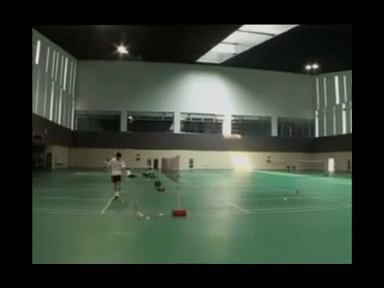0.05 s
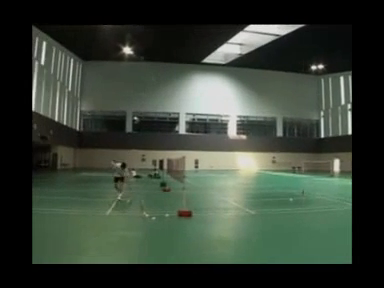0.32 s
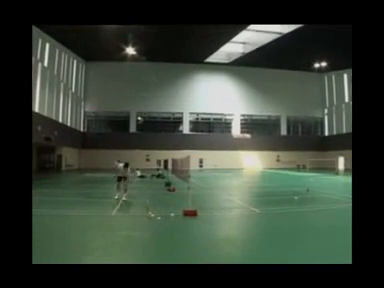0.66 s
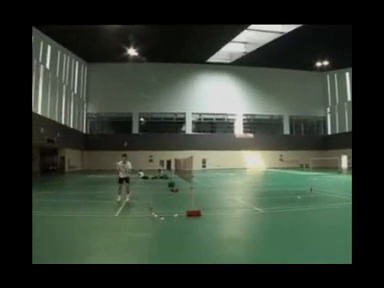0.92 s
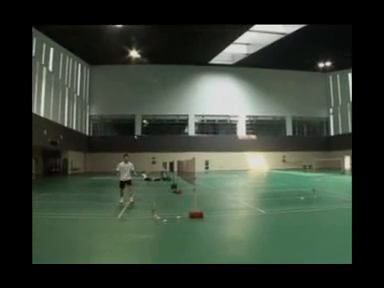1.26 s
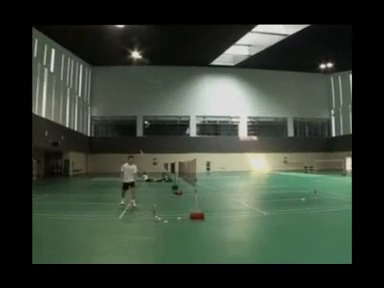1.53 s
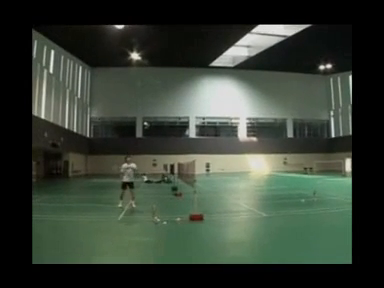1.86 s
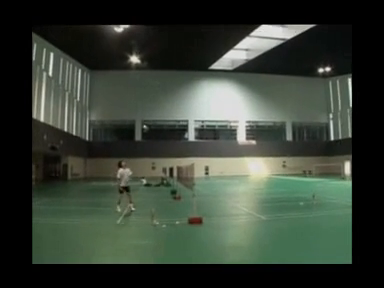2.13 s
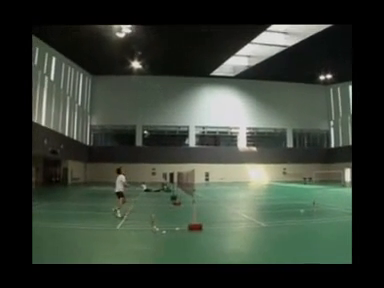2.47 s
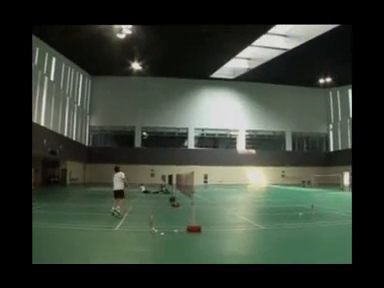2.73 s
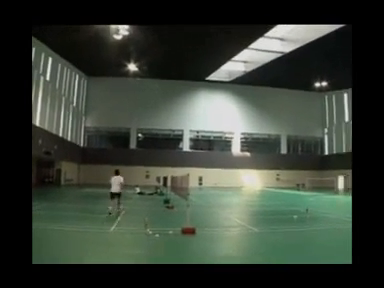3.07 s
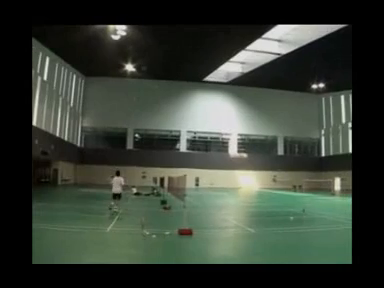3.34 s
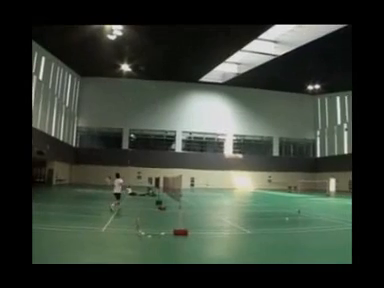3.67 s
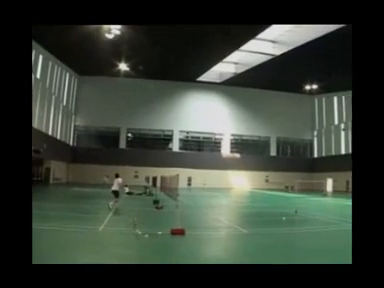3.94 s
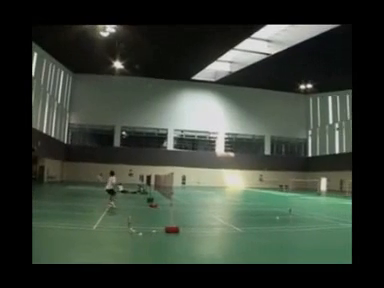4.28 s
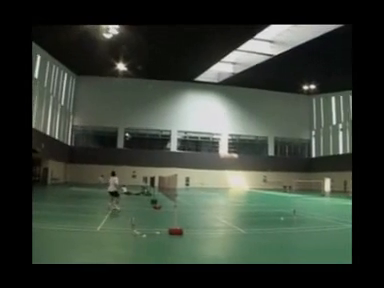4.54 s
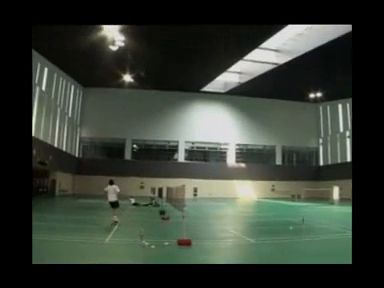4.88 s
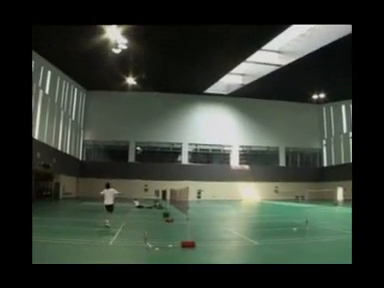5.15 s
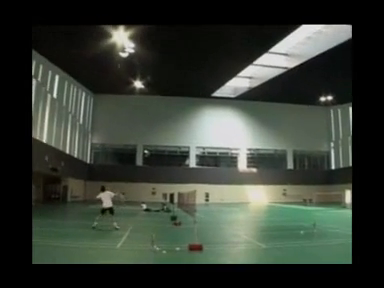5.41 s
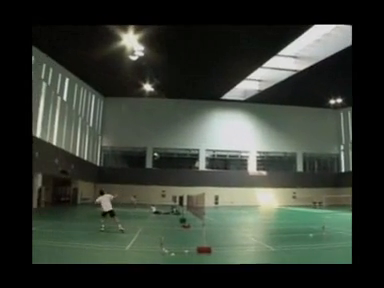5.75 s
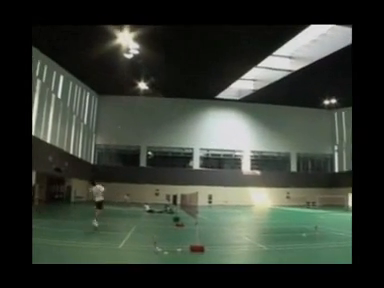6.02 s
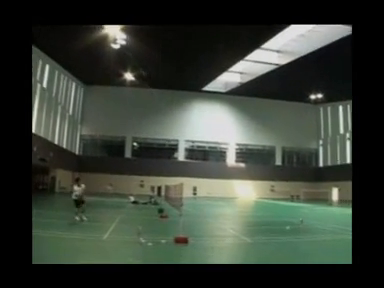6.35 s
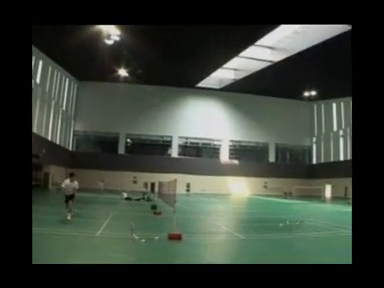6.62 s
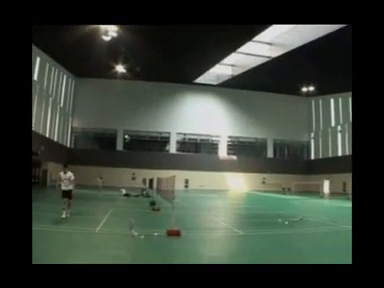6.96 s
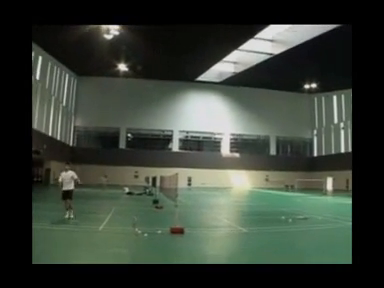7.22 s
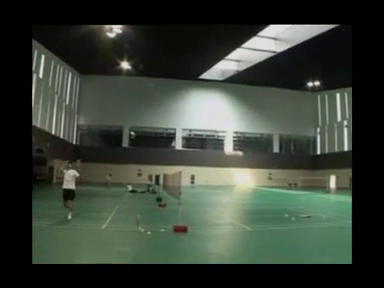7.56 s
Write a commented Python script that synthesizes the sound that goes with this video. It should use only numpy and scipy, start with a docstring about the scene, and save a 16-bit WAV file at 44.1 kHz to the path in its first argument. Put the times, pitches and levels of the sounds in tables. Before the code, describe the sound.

In a large empty sports hall, a badminton racket hits a shuttlecock three times, a couple of seconds apart, each crack echoing off the far walls. A shoe squeaks sharply between the first two hits, and feet tap and scuff lightly. The third hit is the loudest, with a quick swish, and is followed by a hollow knock that rings on. Ventilation rumbles softly underneath.

```python
"""Badminton in an empty sports hall.

The racket swishes and cracks three times, its strings ping, and each stroke slaps back off the far
walls into a long reverb. A shoe squeaks, feet tap and scuff, and the last shot knocks on something
hollow that rings on. Underneath, ventilation rumbles and earlier play fades under the roof."""
import sys
import numpy as np
from scipy import signal
from scipy.fft import rfft, irfft, next_fast_len
from scipy.io import wavfile

SR = 44100
rng = np.random.default_rng(int(sys.argv[2]) if len(sys.argv) > 2 else 0)


def inscribe(sig):
    """Save sig as 16-bit PCM at rate SR to the path in sys.argv[1].

    A 1-D sig is mono; a 2-D sig holds one channel per row.
    Samples are clipped to [-1, 1] before scaling.
    """
    pcm = np.round(np.clip(np.atleast_2d(sig).T, -1, 1) * 32767)
    wavfile.write(sys.argv[1], SR, pcm.astype(np.int16))


N = 334895
SHORT = np.arange(2 ** 14) / SR   # time axis of a one-shot [s]


# Racket hits: (time [s], crack level [dB], crack decay [s], string pitch [Hz], ping level [dB],
# ping towards the walls [dB], swish level [dB], top swish pitch [Hz], reverb send [dB])
STROKES = [(2.0931, -18, 0.0046, 892, -22, -48, -42, 639, -5.5),
           (4.2644, -23, 0.0049, 945, -22, -23.5, -39.5, 598, -3),
           (6.5531, -10, 0.0065, 1045, -25.5, -26, -24.5, 1320, -3.5)]
# One EQ curve per hit, from crisp clear to smash: (frequency [Hz], relative level [dB])
CRACK_COLOURS = [
    [(30, -2), (120, -7.5), (400, 1.5), (1000, 2), (2000, 0), (3200, 2), (4000, -1), (5400, 2.5),
     (7500, -3.5)],
    [(30, -27), (120, -7.5), (300, 3.5), (700, -2), (1200, -3), (1600, 0), (2400, -10.5), (5000, -11.5),
     (7500, -14.5)],
    [(30, -40), (120, -11), (310, 5.5), (500, -3), (750, -2), (1000, -2.5), (1450, -1), (2600, -7.5),
     (4000, -11), (7500, -8.5)],
]
# String bed modes, the lowest a close pair: (pitch ratio [x], relative level [dB], t60 [s])
STRING_MODES = [(1, -7, .32), (1.025, -9, 0.19), (1.529, -19.5, 0.18), (1.63, -13, 0.14),
                (1.96, -16.5, 0.23), (3.25, -17.5, .12)]
# Echoes from where the player stands for each hit:
# (first echo delay [s], its level [dB], its spread [s], far wall level [dB])
PLAYER_SPOTS = [(0.045, -9, 0.017, -17), (.015, -4.5, 0.0066, -21), (.027, -12, 0.0064, -22.5)]

def strokes(swing_s=.05, touch_s=.0021, touch_db=-14, touch_decay=.00031, swing_out_db=-5):
    """Swing, first touch of the shuttle, full impact and string ping; returns near mix and reverb send."""
    near, send = np.zeros((2, N))
    for row, colour, spot in zip(STROKES, CRACK_COLOURS, PLAYER_SPOTS):
        s, db, decay, string_hz, string_db, string_out_db, swish_db, swish_hz, send_db = row
        swing = from_db(swish_db) * swish(swing_s, swish_hz)
        ping = ring([(ratio * string_hz, level, t60) for ratio, level, t60 in STRING_MODES], SHORT)
        add(near, s - swing_s, swing)
        add(near, s - touch_s, crack(colour, db + touch_db, touch_decay))
        add(near, s, crack(colour, db, decay) + from_db(string_db) * ping)
        # the walls get the whole stroke, but a racket is too small to throw much bass
        thin_crack = band(radiated(colour, db), 230, 18000, order=1)
        outward = np.zeros(len(SHORT))
        add(outward, 0, from_db(swing_out_db) * swing)
        add(outward, swing_s, thin_crack + from_db(string_out_db) * ping)
        add(near, s - swing_s, slapback(outward, *spot))
        add(send, s - swing_s, from_db(send_db) * outward)
    return near, send


def crack(colour, db, decay, snap=.2, bounce=.19, bounce_s=.0011):
    """The cork's sharp impact, its reflection off the floor and the clatter of feathers and frame."""
    hit = energy_one(dying_noise(decay))
    hit[0] += snap
    add(hit, bounce_s, np.array([-bounce]))
    return burst(coloured(hit, colour), db)


def radiated(colour, db):
    """Summed over all directions, a crack is one clean pulse with a smooth spectrum."""
    return burst(coloured(signal.unit_impulse(len(SHORT)), colour), db)


def swish(length_s, top_hz, start_ratio=.31, rise_db=48, hiss_db=-5, hiss_rise_db=17):
    """The shaft sheds vortices: a breathy tone climbs and swells with the swing as the strings hiss."""
    speed = np.linspace(0, 1, int(length_s * SR))
    noise = rng.standard_normal((2, len(SHORT)))
    hz = top_hz * (start_ratio + (1 - start_ratio) * speed ** 2)
    phase = 2 * np.pi * np.cumsum(hz) / SR
    wander = rms_one(band(noise[0], 20, 250))[-len(speed):]
    fade_in_db = rise_db * np.interp(speed, [0, .42, .6, 1], [-1, -.45, -.05, 0])
    tone = np.sqrt(2) * np.sin(phase + .93 * wander) * from_db(fade_in_db)
    hiss = rms_one(band(noise[1], 900, 9000, order=1))[-len(speed):]
    hiss_gain = speed * from_db(hiss_db - hiss_rise_db * (1 - speed))
    return (tone + hiss * hiss_gain) * signal.windows.tukey(len(speed), .1)


def ring(modes, t):
    """Struck modes as decaying sines; a small body radiates no deep bass."""
    partials = sum(from_db(db - 60 * t / t60) * np.sin(2 * np.pi * hz * t) for hz, db, t60 in modes)
    return band(partials, 120, 12000)


# EQ of the knock's click: (frequency [Hz], relative level [dB])
KNOCK_COLOUR = [(59, -65), (100, -12.5), (651, 1.5), (1570, 2.5), (1950, 1.5), (3470, -4.5), (5550, -8.5),
                (6760, -10.5), (7400, -5), (9620, -51), (16300, -120)]
# Resonances of the hollow body: (frequency [Hz], level [dB], t60 [s])
KNOCK_MODES = [(211.8, -28, 0.59), (208.5, -33, 3.7), (376, -35, 0.17), (642, -23.5, 0.22), (632, -43, 15),
               (805.5, -29.5, 0.31), (838, -40, 3.5), (940, -38, 0.64), (1040, -43, 0.36), (1270, -54, .7),
               (1550, -37.5, 0.39), (1986, -31.5, 0.25)]

def knock(s=7.097, db=-17.5, click_send_db=-7, ring_send_db=-16):
    """A hard click on a hollow body whose paired modes ring on; returns near mix and reverb send."""
    near, send = np.zeros((2, N))
    body = ring(KNOCK_MODES, np.arange(SR) / SR)
    click = radiated(KNOCK_COLOUR, db)
    add(near, s, body)
    add(near, s, crack(KNOCK_COLOUR, db, decay=.0022))
    # floor and roof smear the click into two overlapping noisy tails
    for delay, tail_db in [(0, -11.9), (.24, -17.1)]:
        add(near, s + delay, scattered(click, tail_db, spread=.4, dull_hz=6000))
    add(send, s, from_db(ring_send_db) * body)
    add(send, s, from_db(click_send_db) * click)
    return near, send


def shoes(skid_s=3.2995, chirp_s=4.868, steps_send_db=-7, skid_send_db=-12, overtone_send_db=-7):
    """Footwork with one loud squeak and one faint one; returns near mix and reverb send."""
    near = footsteps()
    add(near, chirp_s, chirp())
    send = from_db(steps_send_db) * near
    sole = skid()
    add(near, skid_s, sole)
    add(near, skid_s, reflections(sole, [(.016, -25, .005)], dull_hz=8000))   # off the net and posts
    # the overtone beams away from the listener, so the hall gets more of it
    overtone = band(sole, 5150, 5600)
    add(send, skid_s, from_db(skid_send_db) * sole + from_db(overtone_send_db) * overtone)
    return near, send


def skid(slide_s=.0233, slide_hz=4400, slide_db=-28, grip_hz=2634, grip_db=-4.5, rise_hz=190):
    """The sole skids with a falling rasp, grips and sings loud and clean, then bends up as it stops."""
    slide_attack_s, grip_attack_s, release_s = .002, .0039, .0108
    t = SHORT - slide_s   # zero at the grip
    speed = np.clip(-t / slide_s, 0, 1)
    stopping = np.clip(t / release_s, 0, 1)
    grip = swell(t, grip_attack_s, release_s)
    sliding = np.minimum(SHORT / slide_attack_s, 1) * (1 - grip) * (t < 0)
    hz = grip_hz + (slide_hz - grip_hz) * speed + rise_hz * stopping ** 2
    rasping, singing = from_db(slide_db) * sliding, from_db(grip_db) * grip
    loose = rasping / (rasping + singing + 1e-12)
    overtone_db = -26 + 12 * loose + 17 * stopping   # purest at full grip
    return (rasping + singing) * squeak(hz, overtone_db, rough=.6 * loose)


def chirp(start_hz=2990, rise_hz_per_s=15500, db=-53, attack_s=.0082, release_s=.045):
    """A light, scuffy slip that rises in pitch and never grips."""
    envelope = from_db(db) * swell(SHORT - attack_s, attack_s, release_s)
    hz = start_hz + rise_hz_per_s * SHORT
    return envelope * squeak(hz, overtone_db=-7, rough=1, half_order_db=-10, rasp_db=-1)


def squeak(hz, overtone_db, rough, half_order_db=-2, rasp_db=-4, friction_db=-32, wander=.07):
    """Slipping rubber sings over faint friction; uneven grip adds jitter, a half-order tone and rasp."""
    noise = rng.standard_normal((2, len(hz)))
    jitter = wander * rough * rms_one(band(noise[0], 80, 600))
    phase = 2 * np.pi * np.cumsum(hz * (1 + jitter)) / SR
    tone = np.sin(phase) + from_db(overtone_db) * np.sin(2 * phase)
    rasp = rms_one(band(noise[1], 2500, 6700, order=3))
    grit = from_db(half_order_db) * np.sin(1.5 * phase) + from_db(rasp_db) * rasp
    return tone + rough * grit + from_db(friction_db) * rasp


# Footfalls, light taps and one short echo of the smash's swish: (time [s], level [dB], thud pitch [Hz], decay
# [s])
THUDS = [(.653, -46, 1680, 0.0054), (.966, -46, 740, .004), (1.232, -49.5, 696, .003),
         (2.577, -42.5, 145.9, 0.01), (2.897, -43.5, 700, .0035), (4.040, -34.5, 345, 0.0032),
         (4.093, -39.5, 990, 0.0033), (4.306, -30.5, 279, 0.022), (4.49, -37, 302, .012),
         (5.10, -44.5, 405, 0.016), (5.142, -49, 1920, .006), (5.424, -43, 250, .006),
         (6.635, -25, 1040, .008), (6.7076, -26.5, 644, 0.0055), (7.421, -28, 1120, .0035),
         (7.425, -30.5, 326, 0.019)]
# Soles brushing or ticking on the floor: (time [s], level [dB], decay [s])
SCUFFS = [(.171, -52, 0.022), (.375, -56.5, .022), (.783, -50.5, 0.0096), (.803, -52, 0.01),
          (1.088, -59, .009), (6.30, -59.5, .016), (6.827, -40, .0023), (7.318, -41.5, .002)]

def footsteps():
    """Footfalls, taps and one short echo of the swish thud with a faint click; brushing soles scuff over a dull
    body."""
    out = np.zeros(N)
    for s, db, hz, decay in THUDS:
        add(out, s, contact(db, hz, decay, scuff_db=db - 19.5, scuff_decay=.005))
    for s, db, decay in list(SCUFFS) + shuffle():
        add(out, s, contact(db + 2, thud_hz=1200, thud_decay=decay, scuff_db=db, scuff_decay=decay))
    return out


def contact(thud_db, thud_hz, thud_decay, scuff_db, scuff_decay, width=1.21):
    """Sole meets floor: a dull thud layered with a bright scuff."""
    thud = band(dying_noise(thud_decay), thud_hz / width, thud_hz * width, order=1)
    scuff = band(dying_noise(scuff_decay), 2200, 8500)
    return burst(band(thud, 100, 2900), thud_db) + burst(scuff, scuff_db)


def shuffle(count=4, from_s=.55, to_s=.92, db=-59, decay=.02):
    """Faint, uneven scuffs as the player gets ready: (time [s], level [dB], decay [s])."""
    lateness, accent = rng.random((count, 2)).T
    times = from_s + (to_s - from_s) * (np.arange(count) + lateness) / count
    return [(s, level, decay) for s, level in zip(times, db + 2 * accent)]


# Slaps off the far walls: (delay [s], relative level [dB], spread [s])
FAR_WALLS = [(.155, -4.5, .011), (.24, -0.5, 0.0094), (.289, -4, .007), (.36, -2.5, 0.027)]

def slapback(x, first_s, near_db, spread, far_db, gap_s=.027, loss_db=2.5):
    """Three quick, fading echoes off the near surfaces, then the far walls answer."""
    early = [(first_s + k * gap_s, near_db - k * loss_db, spread) for k in range(3)]
    late = [(delay, far_db + db, width) for delay, db, width in FAR_WALLS]
    return reflections(x, early + late, dull_hz=6960)


def reflections(x, echoes, dull_hz):
    """Each surface returns a scattered copy, centred on its delay."""
    out = np.zeros(2 * SR)
    for delay, db, spread in echoes:
        reach = min(4 * spread, delay)   # no echo starts ahead of the direct sound
        add(out, delay - reach, scattered(x, db, spread, dull_hz, reach))
    return out


def scattered(x, db, spread, dull_hz, reach=np.inf):
    """A surface dulls the sound and smears it through a bell-shaped noise burst, at most 0.37 s long."""
    dull = signal.sosfilt(signal.butter(2, dull_hz, fs=SR, output="sos"), x + 1e-18)
    t = SHORT - SHORT.mean()
    smear = rng.standard_normal(len(t)) * np.exp(-(t / spread / 2) ** 2)
    echo = signal.fftconvolve(dull, smear[np.abs(t) < reach])
    return from_db(db) * np.linalg.norm(x) * energy_one(echo)


# Reverb time of the hall: (frequency [Hz], t60 [s])
HALL_T60 = [(100, 8.5), (400, 4), (1000, 5), (2000, 5), (2800, 3), (4000, 2.5), (5500, 1.5), (7500, 1.0)]
# EQ of the reverb: (frequency [Hz], level [dB])
HALL_COLOUR = [(100, 0.5), (300, -1), (600, 0.5), (1000, -0.5), (1800, -1.5), (2800, 0.5), (4500, -0.5),
               (7500, -7.5)]

def hall(send, build_s=.033):
    """The diffuse field blooms and dies away, treble first; its early reflections come in clumps."""
    t = np.arange(3 * SR) / SR
    clump_db = 3 * np.exp(-t) * rms_one(band(rng.standard_normal(len(t)), 25, 250))
    spectrum = rfft(rms_one(rng.standard_normal(len(t)) * from_db(clump_db)))
    hz = np.arange(len(spectrum)) * SR / len(t)
    centres = np.geomspace(100, 8000, 14)
    tail = 0
    for centre, solo in zip(centres, np.eye(len(centres))):
        band_gain = at_hz(np.c_[centres, solo], hz) * from_db(at_hz(HALL_COLOUR, centre))
        fade = from_db(-60 * t / at_hz(HALL_T60, centre))
        tail = tail + irfft(spectrum * band_gain, len(t)) * fade
    bloom = 1 - np.exp(-t / build_s)
    return signal.fftconvolve(band(send, 90, 12000), 2 * tail * bloom / np.sqrt(SR))[:N]


# Swells of earlier play: (peak time [s], level [dB])
WASHES = [(0, -56), (.72, -53.5)]
# EQ of the wash: (frequency [Hz], relative level [dB])
WASH_COLOUR = [(100, -15.5), (300, 2.5), (900, -4.5), (1600, -2), (3000, -25.5), (7000, -31)]

def roof_wash(rise_db_per_s=42, fall_db_per_s=12):
    """Earlier play hangs under the roof as a noise wash that swells and dies away."""
    wash = rms_one(coloured(rng.standard_normal(N), WASH_COLOUR))
    t = np.arange(N) / SR
    swells = [from_db(db + np.minimum(rise_db_per_s * (t - s), fall_db_per_s * (s - t)))
              for s, db in WASHES]
    return wash * np.linalg.norm(swells, axis=0)


# EQ of the ventilation: (frequency [Hz], relative level [dB])
VENT_COLOUR = [(15, -76.5), (25, -47.5), (70, -20), (90, -9.5), (112, -0.5), (223, -7.5), (297, -7.5),
               (377, -10.5), (415, -11.5), (566, -15), (978, -18), (1330, -20.5), (1470, -22.5),
               (1570, -24.5), (7400, -36), (9620, -64.5), (16300, -120)]

def ventilation(db=-51):
    """Moving air lays a soft, steady rumble under the scene."""
    return from_db(db) * rms_one(coloured(rng.standard_normal(N), VENT_COLOUR))


def from_db(db):
    """Decibels to gain."""
    return 10 ** (np.asarray(db) / 20)


def rms_one(x):
    """Scale to rms 1."""
    return x / np.sqrt(np.mean(x ** 2) + 1e-20)


def energy_one(x):
    """Scale to a summed square of 1."""
    return x / np.sqrt(np.sum(x ** 2) + 1e-20)


def burst(x, db):
    """Scale a one-shot to the energy of 10 ms at this level."""
    return from_db(db) * energy_one(x) * np.sqrt(SR / 100)


def dying_noise(decay):
    """Noise with an instant attack and an exponential fade."""
    return rng.standard_normal(len(SHORT)) * (np.exp(-SHORT / decay) + 1e-12)


def swell(t, attack, release):
    """Triangle envelope that peaks at t = 0."""
    return np.clip(np.minimum(1 + t / attack, 1 - t / release), 0, 1)


def at_hz(points, hz):
    """Read a curve on a log-frequency axis."""
    f, value = np.transpose(points)
    return np.interp(np.log(np.maximum(hz, 1)), np.log(f), value)


def coloured(x, curve):
    """Minimum-phase EQ along a curve, rolled off above 9 kHz."""
    size = 2 * next_fast_len(len(x) // 2 + 1)
    hz = np.arange(size // 2 + 1) * SR / size
    gain = from_db(at_hz(curve, hz)) / (1 + (hz / 9000) ** 8)
    cepstrum = irfft(np.log(gain))
    # fold onto positive time, so nothing rings ahead of a transient
    cepstrum[1:size // 2] *= 2
    cepstrum[size // 2 + 1:] = 0
    return irfft(rfft(x, size) * np.exp(rfft(cepstrum)))[:len(x)]


def band(x, low_hz, high_hz, order=2):
    """Butterworth band-pass."""
    return signal.sosfilt(signal.butter(order, [low_hz, high_hz], "band", fs=SR, output="sos"), x)


def add(out, s, x):
    """Mix a sound in at s seconds."""
    i = int(round(s * SR))
    out[i:i + len(x)] += x[:len(out) - i]


def scene():
    """Mono mix: the action and its echoes, the hall reverb and the background bed."""
    near, send = np.sum([strokes(), knock(), shoes()], axis=0)
    return (near + hall(send) + roof_wash() + ventilation())[None]


def record(dry, ceiling=.8, low_cut_hz=35, high_cut_hz=7720):
    """A small microphone chain: peaks are rounded, deep bass rolls off and the top is cut steeply."""
    low_pass = signal.firwin(601, high_cut_hz, fs=SR, window=("kaiser", 7))[None]
    dulled = signal.fftconvolve(dry, low_pass, mode="same", axes=1)
    rounded = dulled / (1 + (dulled / ceiling) ** 8) ** (1 / 8)
    thinned = signal.sosfilt(signal.butter(1, low_cut_hz, "high", fs=SR, output="sos"), rounded)
    return signal.fftconvolve(thinned, low_pass, mode="same", axes=1)


dry = scene()
out = record(dry)
inscribe(out)
```